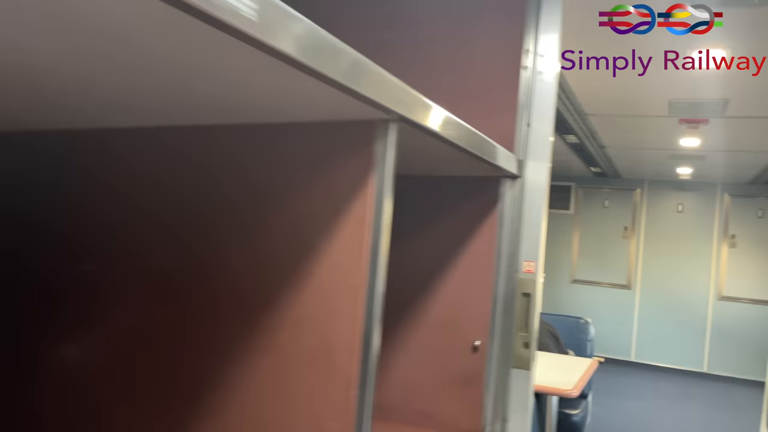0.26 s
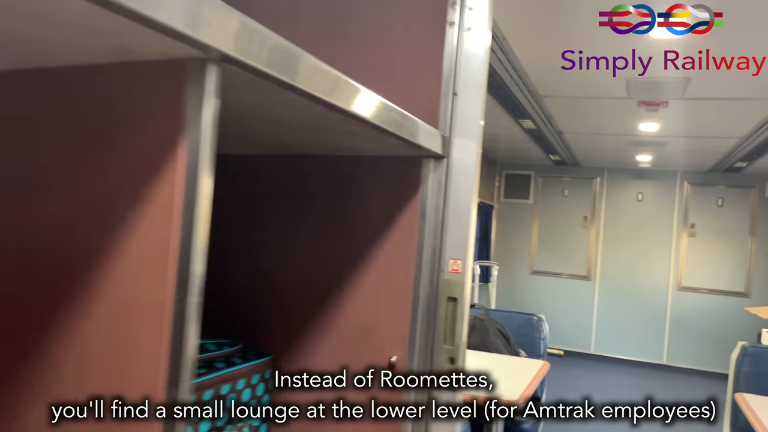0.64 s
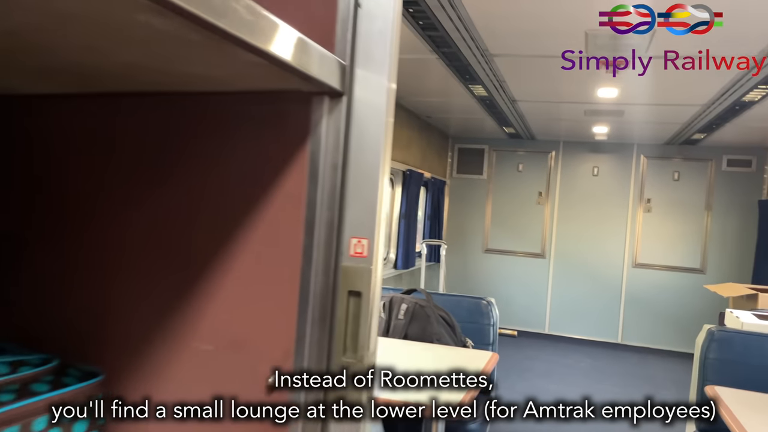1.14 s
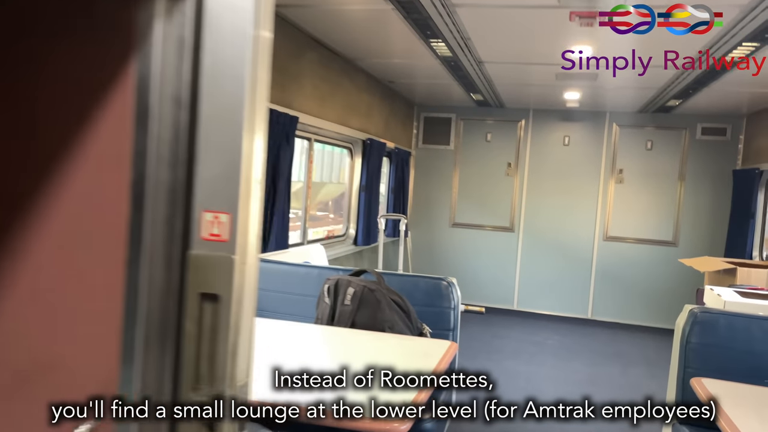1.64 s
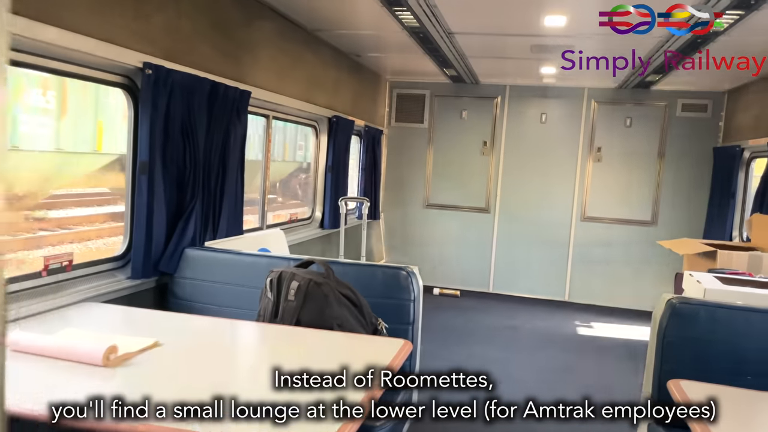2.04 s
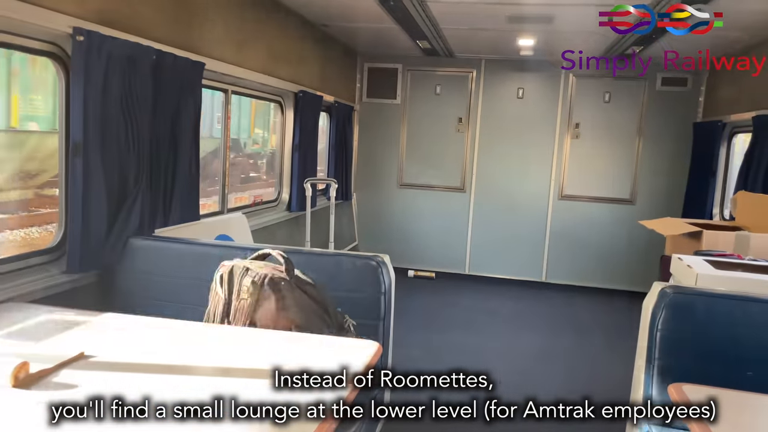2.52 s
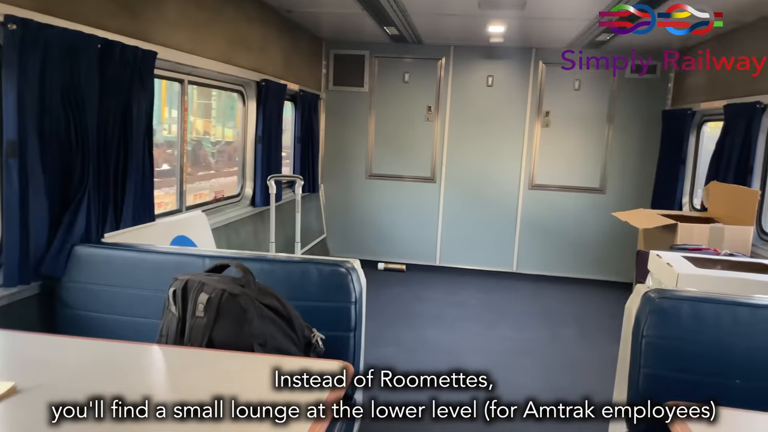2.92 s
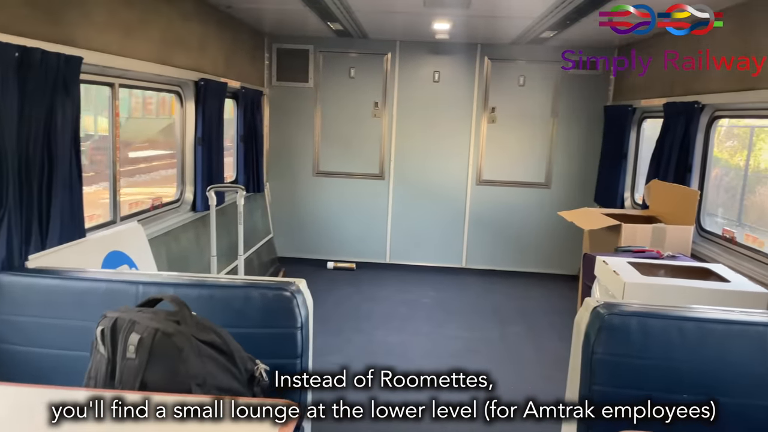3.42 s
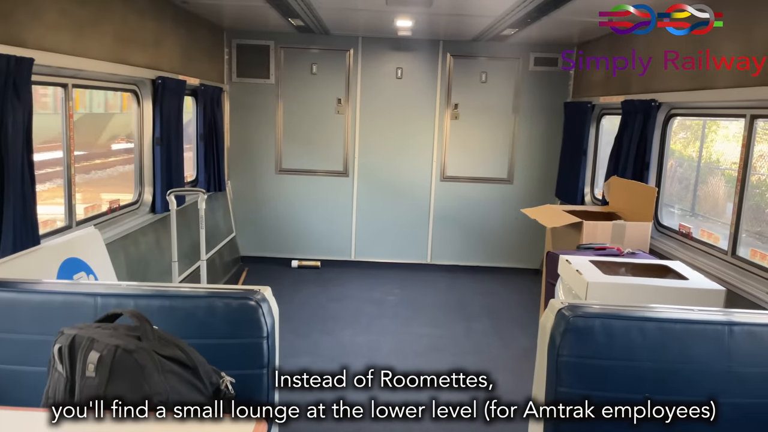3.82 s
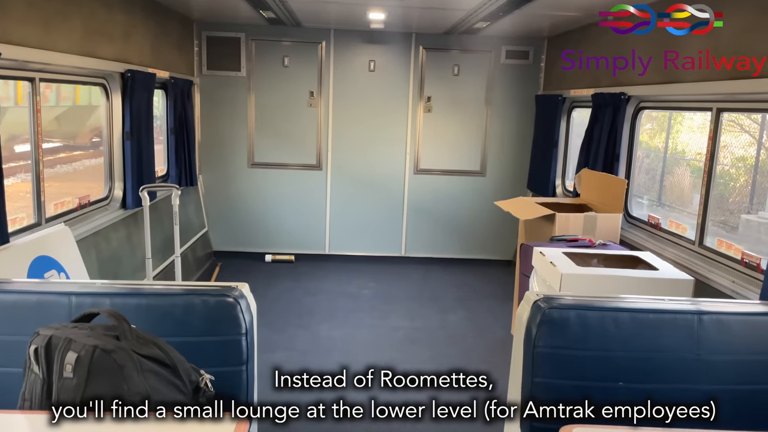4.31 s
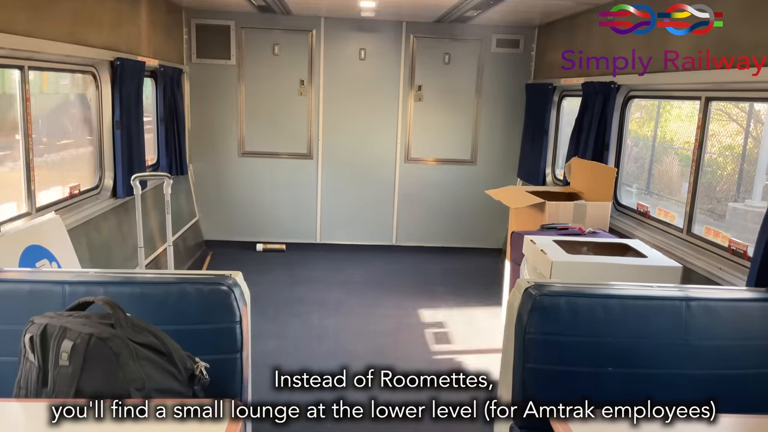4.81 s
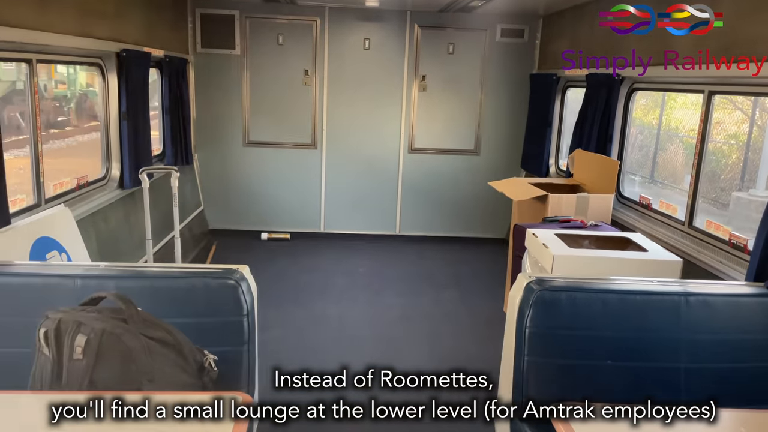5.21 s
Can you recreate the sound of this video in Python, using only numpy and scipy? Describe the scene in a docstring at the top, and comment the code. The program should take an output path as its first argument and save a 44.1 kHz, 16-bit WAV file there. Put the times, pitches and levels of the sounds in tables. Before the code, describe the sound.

Interior of a slowly rolling railcar, captured in stereo by a handheld phone, for about five and a half seconds. A distant diesel drones deep through the floor with a quick throb of about six pulses a second, beneath a dark wheel and ventilation roar, thin wavering fan whines and tiny rattles all round. A click and knock come at 0.2 s, then uneven hollow footfalls with frequent crisp ticks and light rustles from 0.8 to 2.7 s. Very faint squeaks appear around 2.2 and 2.55 s. A deep floor thump lands at 2.75 s, a small metal part jingles at 3.0 s, and the heaviest low thud, with clatter and a short squeak, hits at 3.67 s. Softer knocks and little squeaks follow around 4.3 s, then sparse ticks and bumps to 5.25 s. Hiss lessens gradually, leaving the low rumble more prominent.

```python
"""The carpeted lounge of a slowly rolling railcar, walked into with a phone's microphone in hand.
A distant diesel drones through the floor as multiples of its cycle rate, which beat into a throb.
Wheels and ventilation roar as filtered noise under thin fan whines; chance rattles ring all round.
Footfalls thud on ringing floor panels; fittings and clothes tick and rustle as shaped noise bursts.
Rubbed fittings squeak as wavering tones, and a small metal part jingles as struck modes."""
import sys
import numpy as np
from scipy import signal
from scipy.fft import rfft, irfft, next_fast_len
from scipy.io import wavfile
from scipy.ndimage import uniform_filter1d

SR = 44100
rng = np.random.default_rng(int(sys.argv[2]) if len(sys.argv) > 2 else 0)


def store_wav(level_fs):
    """Save 16-bit WAV to argv[1]."""
    pcm = np.round(np.clip(np.atleast_2d(level_fs), -1, 1) * 32767)
    wavfile.write(sys.argv[1], SR, pcm.T.astype(np.int16))


N = 240477
T = np.arange(N) / SR
SIDES = np.array([[1.], [-1.]])  # left, right


def undb(db):
    """Turn dB into an amplitude factor."""
    return 10 ** (np.asarray(db) / 20)


def along(table, hz):
    """Read (f/Hz, value) points on a log-frequency axis."""
    points_hz, values = np.transpose(table)
    return np.interp(np.log(hz + 1), np.log(points_hz), values)


def wander(rate_hz):
    """A random course, held 1 / rate_hz seconds and slewed twice; its spread is near 1."""
    hold = int(SR / rate_hz)
    held = np.repeat(rng.standard_normal(N // hold + 1), hold)
    slewed = uniform_filter1d(uniform_filter1d(held, hold), hold)
    return 1.3 * slewed[:N]


# Likeness of the left and right noise at the microphone: f/Hz, correlation [-1 to 1]
LIKENESS = [(60, .93), (150, .93), (290, .36), (500, -.12), (1000, -.18), (2000, -.3), (4000, -.05),
            (8000, -.35), (10200, -.2), (11800, .93)]


def stereo_noise(size):
    """Left and right noise spectra, 0 dB per Hz, mixed from mid and side to the set correlation."""
    hz = np.arange(size // 2 + 1) * SR / size
    mid, side = rfft(rng.standard_normal((2, size))) * np.sqrt(SR / 2)
    like = along(LIKENESS, hz)
    return hz, np.sqrt((1 + like) / 2) * mid + np.sqrt((1 - like) / 2) * side * SIDES


def add(out, s, sound, pan_db=0):
    """Mix a short sound in at s seconds; pan_db is left minus right."""
    i = int(s * SR)
    out[:, i:i + sound.shape[-1]] += (sound * undb(pan_db * SIDES / 2))[:, :N - i]


def ring(modes, db, push_ms, spread, detune):
    """Decaying modes let in by a quarter-sine push, each with its own phase shift between the sides."""
    t = T[:SR // 3]
    hz, _, t60 = np.transpose(modes)[:, :, None]
    chance = rng.standard_normal((2, len(modes), 1))
    hz = hz * (1 + detune * chance[0])
    turn = spread * chance[1] * SIDES[:, :, None]
    decay = 1000. ** (-t / t60)
    bell = np.sum(undb(db)[:, None] * np.sin(2 * np.pi * hz * t + turn) * decay, axis=1)
    push = np.sin(np.pi / 2 * np.clip(t * 1000 / push_ms, 0, 1))
    return bell * push


# Engine drone: multiples of the cycle rate [count]
ENGINE_MULTIPLES = [6, 8, 9, 11, 12, 13, 18]
# Their levels before swell and waver, in the same order: level/dB
MULTIPLE_DB = [-53, -48, -38.5, -29.3, -34, -45, -44]
# Multiples that the floor's swell leaves alone [count]
STEADY_MULTIPLES = [9]
CYCLE_HZ, THROB_S = 6.005, .111  # the multiples line up, but for their wander, at THROB_S


def drone(level_db):
    """Multiples of the engine cycle; neighbours beat once a cycle, each wavers a little."""
    cycle = 2 * np.pi * CYCLE_HZ * (T - THROB_S)
    out = 0
    for k, db in zip(ENGINE_MULTIPLES, MULTIPLE_DB):
        side_lag = (.2 + .08 * wander(2)) * SIDES
        lag = .25 * wander(3) + side_lag
        swell_db = 0 if k in STEADY_MULTIPLES else level_db - np.mean(level_db)
        level = np.sqrt(2) * undb(db + swell_db + 0.83 * wander(16.0))
        out = out + level * np.cos(k * cycle + lag)
    pan_db = -2.4 + wander(1.5)
    return out * undb(pan_db * SIDES / 2)


# Roar of wheels and ventilation before its swells: f/Hz, level/dB per Hz
ROAR_SPECTRUM = [(20, -82.5), (35, -65), (50, -54), (70, -48.5), (95, -52), (125, -55), (165, -59.5),
                 (210, -65), (430, -69.5), (520, -74), (1100, -79), (1700, -83), (2200, -87), (3000, -92.5),
                 (4200, -98), (5200, -97.5), (6500, -101.5), (8400, -105), (10000, -112), (13000, -115),
                 (15500, -130)]
# How far the roar follows the treble hiss: f/Hz, share [dB per dB]
HISS_SHARE = [(60, 0), (92, 0.1), (140, 0.05), (500, 0.37), (1000, 0.26), (4000, 0.59), (9000, 0.88),
              (13000, 1.27)]
RUMBLE_HZ, RUMBLE_OCTAVES = 340, 0.26  # centre and reach of the rumble's swell


def roar(rumble_db, treble_db):
    """Half-octave noise bands that flicker partly together, mostly each on its own.

    Low-middle bands swell with the rumble, higher ones with the hiss."""
    size = next_fast_len(N)
    hz, noise = stereo_noise(size)
    noise = noise * undb(along(ROAR_SPECTRUM, hz))
    out, shared = 0, wander(6.55)
    for octave in np.arange(4, 14.5, .5):
        window = np.clip(1 - 2 * abs(np.log2(hz + 1) - octave), 0, 1)
        band = irfft(noise * window, size)[:, :N]
        db = along(HISS_SHARE, 2 ** octave) * (treble_db - np.mean(treble_db))
        rumble_share = np.exp(-((octave - np.log2(RUMBLE_HZ)) / RUMBLE_OCTAVES) ** 2)
        db += rumble_share * (rumble_db - np.mean(rumble_db))
        lean_db = np.interp(octave, [7.5, 8.5, 11, 12, 13], [-2.8, 0, -.8, 4.5, -.5])  # left minus right
        flicker_db = .5 * shared + 1.1 * wander(10)
        out = out + band * undb(db + flicker_db + lean_db * SIDES / 2)
    return out


# Fan whines: f/Hz, level/dB at the start, middle and end before flicker, phase waver [rad]
FAN_WHINES = [(996, -64, -64.5, -70, 2.5), (1271, -68, -68, -67, 2), (10690, -98, -94, -93, 14)]


def whines():
    """Thin fan tones that come and go in level and waver in pitch."""
    out = 0
    for hz, *dbs, waver_rad in FAN_WHINES:
        db = np.interp(T, np.linspace(0, T[-1], 3), dbs) + 3.5 * wander(14)
        phase = 2 * np.pi * hz * T + waver_rad * wander(6.6) + 0.12 * SIDES
        out = out + np.sqrt(2) * undb(db) * np.sin(phase)
    return out


RATTLES_PER_S, LOWEST_HZ, HIGHEST_HZ = 150, 150, 9000
RATTLE_DB, RATTLE_SCATTER_DB = 22, 8  # least level over the roar per Hz, range of chance above it
RATTLE_CYCLES = 60  # 60 dB decay in cycles at 500 Hz, before the time limits


def rattles(treble_db):
    """Small loose fittings all round the car ring briefly by chance, each at its own pitch and place."""
    out, t = np.zeros((2, N)), T[:SR // 8]
    for when, pitch, size, place in rng.random((int(RATTLES_PER_S * T[-1]), 4)):
        hz = LOWEST_HZ * (HIGHEST_HZ / LOWEST_HZ) ** pitch
        t60 = np.clip(RATTLE_CYCLES / np.sqrt(hz * 500), .02, .16)
        db = along(ROAR_SPECTRUM, hz) + RATTLE_DB + RATTLE_SCATTER_DB * size
        db += 7 * abs(np.log10(hz / 500))  # more to either side of 500 Hz
        db += along(HISS_SHARE, hz) * (treble_db[int(when * (N - 1))] - np.mean(treble_db))
        tone = np.sin(2 * np.pi * hz * t + np.pi * (place - .5) * SIDES)
        envelope = 1000. ** (-t / t60) * np.clip(t / 0.007, 0, 1)
        add(out, when * T[-1], undb(db) * tone * envelope, 12 * (place - .5))
    return out


# Footfalls and bumps: t/s, level/dB before the panels' own, favoured f/Hz, reach [octaves], push [ms]
FOOTFALLS = [(0.036, -47, 252, 2.5, 2.7), (0.1947, -26, 606, 1.8, 0.93), (0.761, -39, 214, 0.39, 4.2),
             (.955, -32, 197, 1.6, 6.6), (1.431, -24.5, 317, 2.3, 9.9), (1.803, -34, 217, 0.93, 4.8),
             (1.988, -28, 745, 0.43, 5.2), (2.005, -35, 740, .35, 4.2), (2.075, -28.5, 750, 0.57, 9),
             (2.365, -26, 390, 0.85, 12), (2.39, -28.5, 380, 0.77, 8), (2.419, -32.5, 199, 1.2, 2.3),
             (2.745, -26.5, 365, 0.46, 6.5), (2.762, -8, 124, 0.6, 8.6), (2.775, -28.5, 294, 0.52, 10),
             (3.654, -21, 198, 1.7, 7.3), (3.663, -25, 654, 0.8, 5.8), (3.6695, -4, 100, .6, 14),
             (3.674, -27.5, 430, 1.4, 3.7), (3.69, -23, 222, .5, 3.9), (3.732, -29.5, 335, 0.51, 3.5),
             (4.251, -24, 91, 0.68, 4.6), (4.30, -26, 308, 0.26, 8.8), (4.376, -25, 353, 0.18, 3.3),
             (4.74, -33, 360, 0.27, 7.6), (4.976, -30.5, 398, 0.66, 3), (5.25, -37.5, 513, .9, 3.3)]
# Ringing modes of the floor panels: f/Hz before detuning, level/dB, 60 dB decay [s]
FLOOR_MODES = [(87.2, 3, 0.19), (114.4, -3, 0.18), (223, 6.5, 0.11), (256.7, 5.5, 0.081),
               (313.8, -0.5, 0.12), (358.5, -4, 0.19), (416, -17, 0.16), (457, 1.5, 0.095),
               (539, -1.5, 0.049), (693, -0.5, 0.049), (867, -11, 0.046), (965, -5, 0.11),
               (1270, -12, 0.025), (1880, -11, 0.036)]
REACH_DB, STEP_PAN_DB = 13.5, -3.5  # fall of the modes one reach from the favoured pitch; left minus right
BOUNCES, BOUNCE_GAP_S, BOUNCE_DB = 3, .028, -12  # count after a blow, mean gap, change at each
BOUNCE_THIN_HZ, BOUNCE_THIN_DB = 200, -8.5  # further change at each bounce, per octave below that pitch


def steps():
    """Each blow pushes the floor panels, favouring modes near its own pitch, then bounces unevenly."""
    out = np.zeros((2, N))
    hz, mode_db, _ = np.transpose(FLOOR_MODES)
    thin_db = BOUNCE_THIN_DB * np.clip(np.log2(BOUNCE_THIN_HZ / hz), 0, None)
    for s, db, pitch_hz, reach, push_ms in FOOTFALLS:
        share_db = -REACH_DB * abs(np.log2(hz / pitch_hz)) / reach
        gaps = np.append(0, BOUNCE_GAP_S * (.5 + rng.random(BOUNCES)))
        for k, late in enumerate(np.cumsum(gaps)):
            struck_db = db + k * (BOUNCE_DB + thin_db) + mode_db + share_db
            blow = ring(FLOOR_MODES, struck_db, push_ms, spread=.16, detune=.015 * (1 + k))
            add(out, s + late, blow, STEP_PAN_DB)
    return out


# Ticks and rustles of fittings and clothes: t/s, relative level/dB, snap [0-1], ring f/Hz,
# ring level/dB over the burst, relative level/dB over 8 kHz
TICKS_AND_RUSTLES = [(0.1938, -33.5, 0.5, 6500, -2, -6), (.204, -41.5, 0.12, 5200, -3, -20),
                     (.33, -49.5, 0.4, 6500, -20, -6), (.8775, -41.5, 0.31, 6800, 6, -5.5),
                     (.882, -45.5, 0.5, 5100, 6, -20), (.987, -42.5, 0.45, 2350, 9.5, -22),
                     (1.003, -48, 0.25, 1450, 8, -30), (1.0867, -42.5, 0.6, 2300, 5, -36),
                     (1.093, -49, 0.5, 3250, 6, -36), (1.2885, -42.5, 0.37, 6060, 2, -10),
                     (1.296, -44, .25, 2000, 9, -30), (1.3341, -40.5, 0.28, 4180, 2.5, -13),
                     (1.4441, -41.5, 0.42, 2800, 7, -16), (1.509, -45, 0.7, 3400, 9, -30),
                     (1.966, -43.5, 0.3, 6200, 1, -15), (2.13, -52.5, 0.5, 9000, 5, -10),
                     (2.241, -48.5, 0.27, 5100, 7, -15), (2.392, -51, 0.96, 5000, 2, -24),
                     (2.4595, -43, 0.6, 3300, 4, -13), (2.463, -45, .3, 1600, 9, -32),
                     (2.661, -47, 0.7, 3600, 9, -11.5), (2.737, -46.5, 0.18, 5500, -1, -16),
                     (2.986, -55.5, 0.2, 8100, 8, 1), (3.06, -53, 0.19, 8150, 1, -3),
                     (3.57, -44, 0.01, 4400, -4, -16), (3.664, -36.5, 0.27, 3600, -2, -17.5),
                     (3.678, -44, 0.17, 8300, 0, -16), (3.694, -45.5, 0.13, 6300, -4, -16),
                     (3.712, -38, 0.25, 1650, 4, -22), (3.74, -50, 0.05, 3220, 9.5, -15),
                     (3.8097, -52, 0.08, 3200, -3, -35), (4.08, -58, 0.06, 5000, 11.5, -31),
                     (4.3, -48, 0.12, 2600, 7, -14.5), (4.385, -51.5, 0.8, 4200, 7, -18),
                     (4.5305, -49.5, 0.11, 4500, -4, -19), (4.7237, -48.5, 0.56, 3300, -1, -18),
                     (4.8694, -47.5, 0.36, 3600, 5, -21), (4.889, -48, 0.57, 6300, 4, -18),
                     (4.899, -50, 0.8, 3200, 9, -17), (4.9714, -51.5, 0.7, 6600, -1, -18),
                     (4.992, -57, .8, 4600, 2, -24), (5.0, -60, 0.05, 5000, 7, -30),
                     (5.248, -47.5, 0.38, 4600, -3, -24)]
TICK_T60_S, RUSTLE_EXTRA_S = 0.21, 0.99  # tail's 60 dB decay; what full softness adds to it
CLICK = 1800  # first contact of a full snap, before colouring
TICK_PAN_DB = 2.5  # left minus right


def ticks():
    """A short snap, then a grainy tail scattered by the car's walls; each part rings at its own pitch."""
    out, size = np.zeros((2, N)), SR // 3
    t = T[:size]
    for s, db, snap, ring_hz, ring_db, high_db in TICKS_AND_RUSTLES:
        hz, noise = stereo_noise(size)
        soft = (1 - snap) ** 12  # rustles without a snap swell in and last longer
        grain = undb(2. * np.repeat(rng.standard_normal(size // 256 + 1), 256)[:size])  # slips, 6 ms each
        decay = 1000. ** (-t / (TICK_T60_S + soft * RUSTLE_EXTRA_S))
        rise = np.clip(t / (0.0036 + 0.081 * soft), 0, 1)
        burst = irfft(noise, size) * (snap * 2 * np.exp(-t / .002) + decay * rise * grain)
        burst[:, 0] += snap * CLICK
        dull_db = 9 * np.log2(max(5500 / ring_hz, 1))  # bigger, lower parts have less top
        low_db = -0.34 * max(ring_db, 0)  # parts that ring clearly have little body
        colour = [(250, low_db - 67.5), (600, low_db - 14.0), (1600, low_db - 21.0),
                  (2500, -29.5), (7000, -30.5 - dull_db),
                  (9000, high_db - 27.5), (12000, high_db - 37.0), (15000, high_db - 40.0)]
        # chance peaks and dips colour each burst differently
        ripple = np.column_stack([np.geomspace(400, 15000, 48), 2.4 * rng.standard_normal(48)])
        peak_db = ring_db * np.exp(-(np.log((hz + 1) / ring_hz) / 0.16) ** 2)
        colour_db = along(colour, hz) + along(ripple, hz) + peak_db
        coloured = irfft(rfft(burst) * undb(colour_db), size)
        lead = 64  # samples of room for the filter's rise
        sound = np.roll(coloured, lead, axis=1)
        add(out, s - lead / SR, sound * undb(db - 12.0), TICK_PAN_DB)
    return out


# Squeaks of fittings: t/s, length [s], mean f/Hz, level/dB before swell and flutter
FITTING_SQUEAKS = [(2.218, 0.09, 2590, -62), (2.54, 0.034, 2400, -66), (2.562, 0.071, 2520, -64),
                   (3.706, 0.043, 1693, -54), (4.24, 0.041, 1680, -60), (4.26, .035, 1530, -62),
                   (4.308, 0.064, 1650, -67), (4.33, 0.064, 2480, -66), (4.382, .035, 1425, -58)]
SQUEAK_WAVER, SQUEAK_FLUTTER_DB = .016, 4  # share of the pitch, spread of the level


def squeaks():
    """Brief rubbed tones that swell, waver and flutter."""
    out = np.zeros((2, N))
    waver, flutter = wander(200), wander(250)
    for s, length_s, hz, db in FITTING_SQUEAKS:
        i, size = int(s * SR), int(length_s * SR)
        pitch_hz = hz * (1 + SQUEAK_WAVER * waver[i:i + size])
        phase = 2 * np.pi * np.cumsum(pitch_hz) / SR
        swell = np.sqrt(2 * np.sin(np.pi * np.arange(size) / size))
        level = undb(db + SQUEAK_FLUTTER_DB * flutter[i:i + size])
        add(out, s, swell * level * np.sin(phase + 0.18 * SIDES))
    return out


# Jingles of a small metal part: t/s, level/dB before the modes' own, touches [count]
METAL_JINGLES = [(2.983, -59, 5), (3.06, -62, 4)]
# Modes of the metal part: f/Hz before detuning, level/dB before scatter, 60 dB decay [s]
METAL_MODES = [(3451, -8, .05), (5997, -12, .04), (8231, -2, .035), (9577, 0, .05), (11240, -7, .03),
               (12670, -14, .03)]
TOUCH_GAP_S, TOUCH_SLOWING, TOUCH_SCATTER_DB = .0085, 1.2, 3  # first gap, growth of each next gap, spread


def jingles():
    """A small metal part rattling, its touches ever further apart; each favours other modes."""
    out = np.zeros((2, N))
    for s, db, touches in METAL_JINGLES:
        for k in range(touches):
            at = s + TOUCH_GAP_S * (TOUCH_SLOWING ** k - 1) / (TOUCH_SLOWING - 1)
            scatter_db = TOUCH_SCATTER_DB * rng.standard_normal(len(METAL_MODES))
            mode_db = np.transpose(METAL_MODES)[1] + scatter_db
            add(out, at, ring(METAL_MODES, db + mode_db, 2.5, spread=1.2, detune=.006))
    return out


# Course of the walk; only the departures from each column's mean over time are heard:
# t/s, drone level/dB as the floor carries it, 200-450 Hz rumble level/dB, treble hiss level/dB
WALK_LEVELS = [(0, -33, -46, -61.5), (.3, -37.5, -54.5, -66), (0.549, -27, -48, -69.5),
               (.8, -35.5, -48, -70.5), (1.349, -34, -48, -64), (2., -32, -48.5, -67),
               (2.35, -36, -47, -73.5), (2.9, -28, -39.5, -72), (3.3, -29.5, -41.5, -78.5),
               (3.8, -30.5, -36, -76), (4.2, -30, -47.5, -74), (4.8, -29, -40.5, -77),
               (5.1, -29, -44, -74.5), (5.45, -23.5, -47, -75.5)]


def scene():
    """Every source in the car, with drone, rumble and hiss levels following the walk."""
    s, *columns = np.transpose(WALK_LEVELS)
    drone_db, rumble_db, treble_db = (np.interp(T, s, column) for column in columns)
    car = drone(drone_db) + roar(rumble_db, treble_db) + whines() + rattles(treble_db)
    return car + steps() + ticks() + squeaks() + jingles()


# Dips of the microphone ports: f/Hz, width [Hz], depth [dB]
PORT_DIPS = [(5700, 220, 7), (7550, 330, 7)]
TOP_HZ = 15000


def record(dry):
    """The microphone ports cut two dips in the treble; the top is cut steeply."""
    size = next_fast_len(N)
    hz = np.arange(size // 2 + 1) * SR / size
    dip_db = 0
    for at_hz, width_hz, depth_db in PORT_DIPS:
        dip_db = dip_db + depth_db * np.exp(-((hz - at_hz) / width_hz) ** 2)
    wet = irfft(rfft(dry, size) * undb(-dip_db), size)[:, :N]
    top_cut = signal.ellip(8, .2, 70, TOP_HZ, fs=SR, output="sos")
    return signal.sosfilt(top_cut, wet)


dry = scene()
out = record(dry)
store_wav(out)
```